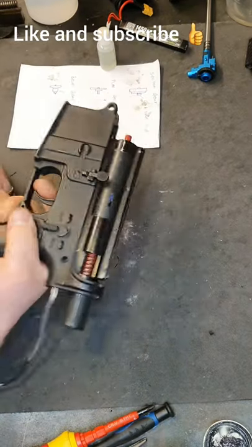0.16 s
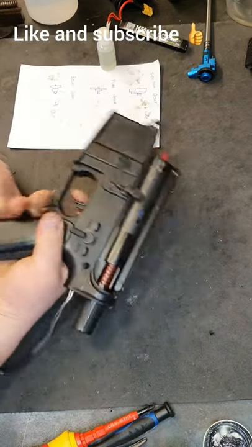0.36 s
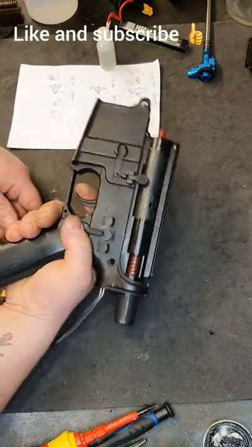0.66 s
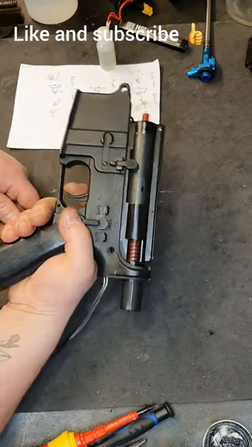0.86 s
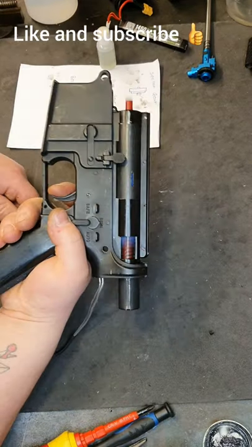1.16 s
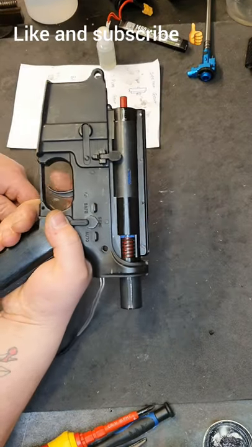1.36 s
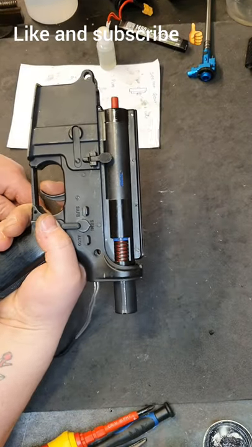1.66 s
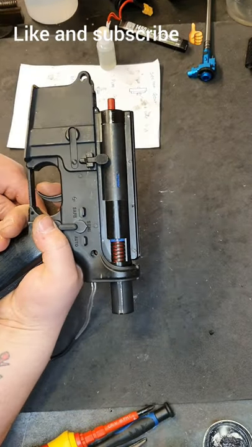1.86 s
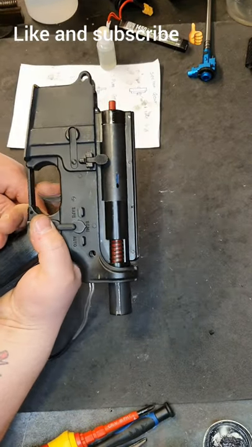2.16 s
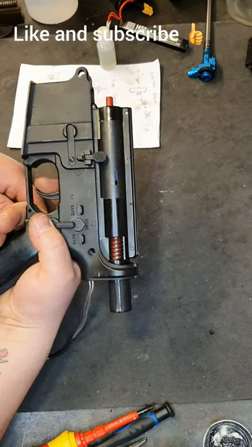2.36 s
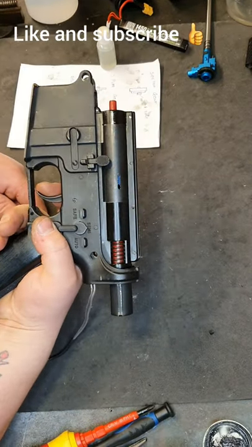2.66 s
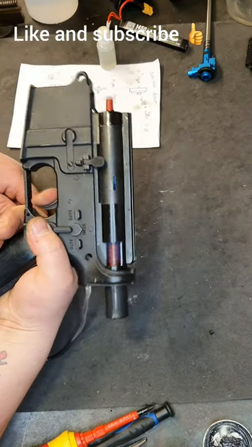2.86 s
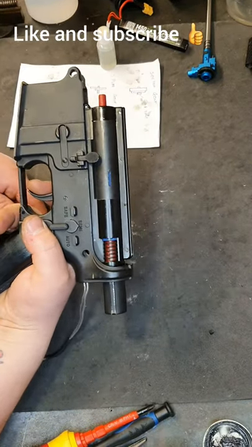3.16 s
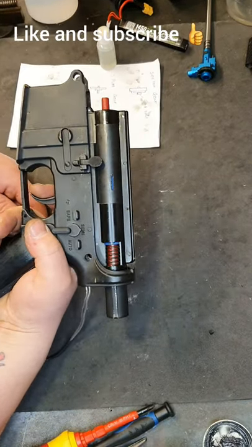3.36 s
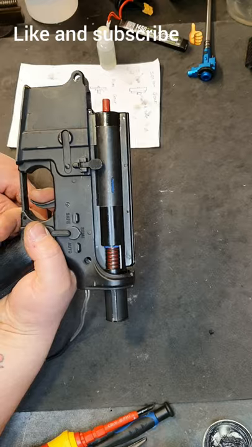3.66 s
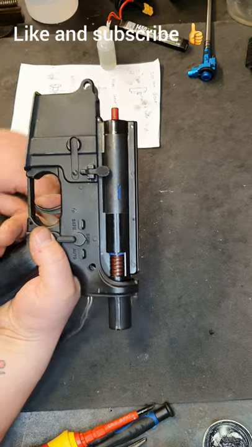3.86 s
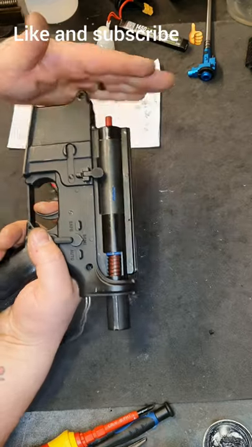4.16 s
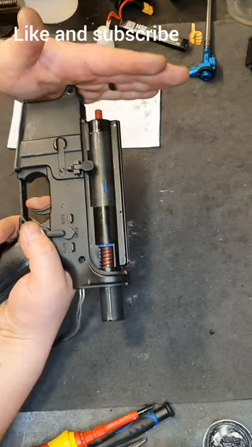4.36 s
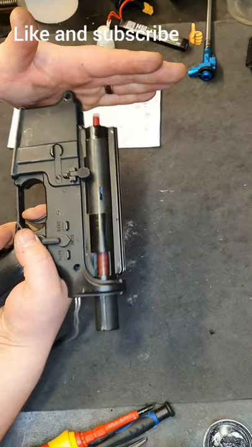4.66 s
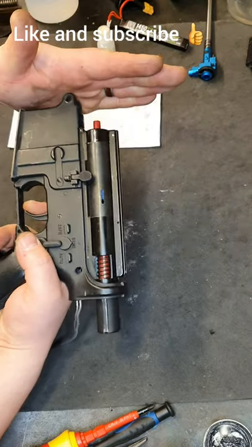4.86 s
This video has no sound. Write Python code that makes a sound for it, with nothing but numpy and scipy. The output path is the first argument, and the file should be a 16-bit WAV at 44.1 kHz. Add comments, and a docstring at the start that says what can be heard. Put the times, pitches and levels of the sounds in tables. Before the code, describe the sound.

An electric toy gun fires four single sharp shots with a brief gear whirr, amid soft hand rubbing in a small room.

```python
"""Airsoft gearbox on a workbench

An opened electric airsoft gearbox is dry-fired four times in a small room. On each shot the motor kicks
in, the gears wind the spring, the piston slams home, the gears coast and a latch catches them.
Between shots the hands rub and tick on the plastic shell and bump the bench, over a steady hush."""
import sys
import numpy as np
from scipy import signal
from scipy.fft import rfft, irfft, next_fast_len
from scipy.io import wavfile
from scipy.ndimage import uniform_filter1d, map_coordinates

SR = 44100
rng = np.random.default_rng(int(sys.argv[2]) if len(sys.argv) > 2 else 0)


def materialize(psi):
    """Save the field psi as 16-bit PCM at rate SR to the path in sys.argv[1].

    A 1-D psi becomes a single channel; in a 2-D psi each row is a channel.
    """
    bounded = np.clip(np.atleast_2d(psi).T, -1, 1)
    quanta = np.round(bounded * 32767).astype(np.int16)
    wavfile.write(sys.argv[1], SR, quanta)


N = 220852

# The four shots. Each row: motor start, piston slam and latch catch in seconds; levels of the gears,
# motor kick, piston rebound and latch in dB; the latch bounce's delay in seconds and level in dB.
SHOTS = [(1.1515, 1.197, 1.2905, -9.7, -6.5, -7, -10, .014, -15),
         (2.0315, 2.0703, 2.1585, -14.5, -15.5, -12, -13.5, .0105, -23),
         (2.827, 2.8705, 2.9625, -13, -13.5, -11.5, -16.3, .0075, -20),
         (4.629, 4.667, 4.7675, -10, -9.5, -11, -12, .009, -27)]
# Resonances of the gearbox shell. Each row: frequency in Hz, width in Hz, peak strength in dB.
SHELL = [(121, 39, -7.5), (276.5, 8.3, 10), (368, 18, 2), (423, 20, 6.5), (530, 70, 1), (718, 91, 9),
         (1116, 56, -3), (1370, 90, 0.5), (1553, 41, 0.5), (1935, 72, 2), (2140, 20, -3), (2841, 81, -0.5),
         (3020, 37, -4.5), (3686, 100, 1.5), (3884, 120, 5), (4540, 120, -7), (6800, 250, 0.5),
         (11960, 1000, 0)]
# Tone of the piston's slam. Each row: frequency in Hz, relative level in dB.
PISTON_TONE = [(40, -22.5), (200, -11), (450, -7.5), (700, -8), (1500, 6), (4000, -0.5), (7000, -1),
               (12000, -2), (16000, -9)]
# Tone of the latch's snap. Each row: frequency in Hz, relative level in dB.
LATCH_TONE = [(40, -16), (150, -19.5), (380, -12), (600, 1), (800, -0.5), (1050, -3), (2000, 3.5),
              (4500, 3.5), (7500, -8.5), (12000, -9), (16000, -12.5)]
FLIGHT_S = .0053  # from the piston's release until it hits the cylinder head


def gears(mesh_hz=1950, spin_up_s=.012, swell_db=14, coast_db=-19.5, coast_s=.046, slowing_s=.18):
    """The gears grow louder as the spring loads them, hush as the piston flies, then coast and brake."""
    # Tone of the gears under load, then running free. Each row: frequency in Hz, relative level in dB.
    winding_tone = [(40, -33), (160, -11), (380, -17), (700, -8), (1100, -1.5), (2400, -0.5), (3500, 2.5),
                    (4500, 4.5), (5800, -5.5), (9000, -11), (16000, -17.5)]
    coasting_tone = [(40, -37.5), (200, -18), (500, -3.5), (1100, -.5), (1600, -0.5), (2600, 2.5),
                     (3800, 4), (5500, -1), (8000, -5.5), (12000, -8), (16000, -12)]
    loaded, free, t = np.zeros(N), np.zeros(N), np.arange(SR // 5) / SR
    for start, slam, _, gear_db, *_ in SHOTS:
        load = t / (slam - FLIGHT_S - start)
        speed = 1 - np.exp(-t / spin_up_s)
        effort_db = swell_db * (np.minimum(load / 0.68, 1) - 1)
        engaged = np.clip((1 - load) / 0.065, 0, 1)  # the last tooth slips off the piston
        add(loaded, start, amp(gear_db + effort_db) * engaged * teeth(mesh_hz * speed, scrape=1.0))
        braking_s = np.maximum(t - coast_s, 0)
        whirr = teeth(mesh_hz * np.exp(-braking_s / slowing_s), scrape=1.1)
        add(free, slam + .0045, amp(coast_db - 560 * braking_s) * whirr)  # fades 560 dB a second
    rattle = amp(1.8 * wobble(300))
    return coloured(loaded * rattle, winding_tone, SHELL) + coloured(free * rattle, coasting_tone, SHELL)


def teeth(rate_hz, scrape):
    """Gear teeth meet early or late within their play, and scrape between meetings."""
    count = len(rate_hz)
    play = np.abs(1 + 1.3 * uniform_filter1d(rng.standard_normal(count), size=40))
    teeth_passed = np.floor(np.cumsum(rate_hz * play) / SR)
    meetings = np.diff(teeth_passed, prepend=0) - rate_hz / SR
    buzz = meetings * np.sqrt(SR / rate_hz.max())
    return (buzz + scrape * rng.standard_normal(count)) / np.hypot(1, scrape)


def impacts():
    """The motor takes up the gear play, the piston slams, the latch drops in; each rings the shell."""
    # Tone of the motor's kick. Each row: frequency in Hz, relative level in dB.
    kick_tone = [(40, -25), (160, -17.5), (400, -15.5), (620, -1), (760, 7.5), (1000, -1), (2500, 4.5),
                 (4200, 2.5), (6000, -18.5), (16000, -26.5)]
    kicks = strikes([(start, kick_db) for start, _, _, _, kick_db, *_ in SHOTS], t60=.052, attack=.003)
    slams = strikes(piston_blows(), t60=.015)
    catches = strikes(latch_blows(), t60=0.033, attack=0.00015)
    return (coloured(kicks, kick_tone, SHELL) + coloured(slams, PISTON_TONE, SHELL)
            + coloured(catches, LATCH_TONE, SHELL))


def piston_blows(slam_db=-4, rebound_s=.031, settle_s=.009, settle_loss_db=5.5):
    """The piston hits, comes back, then once more, sooner and weaker: (seconds, dB) of each blow."""
    blows = []
    for _, slam, _, _, _, rebound_db, *_ in SHOTS:
        back = slam + rebound_s
        blows += [(slam, slam_db), (back, rebound_db), (back + settle_s, rebound_db - settle_loss_db)]
    return blows


def latch_blows():
    """The latch drops in and bounces once: (seconds, dB) of each blow."""
    blows = []
    for _, _, catch, *_, latch_db, delay, bounce_db in SHOTS:
        blows += [(catch, latch_db), (catch + delay, bounce_db)]
    return blows


def cracks(piston_db=-3.5, latch_db=-3.0):
    """The first instant of each hard contact reaches left and right straight from the metal."""
    def channel():
        slam = amp(piston_db) * coloured(strikes(piston_blows(), t60=.009), PISTON_TONE)
        snap = amp(latch_db) * coloured(strikes(latch_blows(), t60=0.017), LATCH_TONE)
        return slam + snap
    return np.vstack([channel(), channel()])


def recoil(shake_db=-27.5, rise_s=0.011, ring_db=-72.0):
    """The released spring shakes the whole shell and rings on thinly."""
    # The spring's partials. Each row: frequency in Hz, relative level in dB, t60 in seconds.
    partials = [(7980, -7.5, .6), (8145, -4, .6), (8360, -1.5, .7), (8900, -10.5, 0.95), (9200, -2.5, 0.85)]
    # Tone of the low shudder. Each row: frequency in Hz, relative level in dB.
    shake_tone = [(25, -21), (70, -8.5), (115, 2), (165, -2.5), (280, -4), (500, -9.5), (1200, -26.5),
                  (5000, -60)]
    shake, ring, t = np.zeros(N), np.zeros(N), np.arange(SR // 2) / SR
    swell = amp(shake_db) * (t / rise_s) * np.exp(1 - t / rise_s)
    for _, slam, *_ in SHOTS:
        release = slam - FLIGHT_S
        add(shake, release, swell * rng.standard_normal(len(t)))
        for hz, db, t60 in partials:
            decay = amp(ring_db + db + rng.normal(0, 3.5) - 60 * t / t60)
            add(ring, release, decay * np.sin(2 * np.pi * hz * t))
    return coloured(shake, shake_tone, SHELL) + ring


def bumps(drag_db=-30, drag_rise_s=0.0069):
    """Soft pushes set the bench booming; firmer ones reach its higher modes, and each drags a little."""
    # Pushes on the bench. Each row: start in seconds, level in dB, corner in Hz (lower is softer).
    pushes = [(3.913, -16.5, 150), (3.956, -9.5, 330), (3.969, -12, 250), (4.018, -12.5, 220),
              (4.030, -8.5, 121)]
    # Tone of the bench top. Each row: frequency in Hz, relative level in dB.
    bench_tone = [(20, -40), (60, 0.5), (250, -2.5), (450, -0.5), (850, 7.5), (1500, -22), (16000, -54)]
    # Resonances of the bench. Each row: frequency in Hz, width in Hz, peak strength in dB.
    bench_modes = [(73, 8, 26), (127, 14.5, 23.5), (197, 17.4, 26), (299, 24, 18)]
    force, t = np.zeros(N), np.arange(SR // 10) / SR
    drag = amp(drag_db) * (t / drag_rise_s) * np.exp(1 - t / drag_rise_s)
    for start, db, corner_hz in pushes:
        contact = drag * rng.standard_normal(len(t))
        contact[0] = 1  # the push itself
        cushion = np.exp(-2 * np.pi * corner_hz * t) * np.sqrt(corner_hz / SR)
        add(force, start, amp(db) * signal.fftconvolve(contact, cushion))
    return coloured(force, bench_tone, bench_modes)


def plastic_ticks(motion, trigger_lead_s=.043, trigger_db=-43):
    """The shell ticks and creaks in the hand, and the trigger clicks just before the motor starts."""
    # Clear ticks of the shell. Each row: start in seconds, level in dB.
    ticks = [(.225, -32), (.604, -36), (.634, -33), (.727, -35.5), (.902, -34), (1.549, -43), (1.666, -42),
             (1.736, -44.5), (2.374, -43.5), (2.69, -47), (3.349, -43.5), (3.958, -38.5), (4.07, -35.5),
             (4.272, -42.5), (4.443, -40.5), (4.959, -46.5)]
    # Tone of the plastic. Each row: frequency in Hz, relative level in dB.
    plastic_tone = [(50, -11), (300, 6.5), (900, 4.5), (2000, 5), (4000, -3), (7000, -18), (16000, -46)]
    triggers = [(start - trigger_lead_s, trigger_db) for start, *_ in SHOTS]
    clicks = strikes(list(ticks) + triggers, t60=0.017, attack=0.00025)
    return coloured(clicks + creaks(motion), plastic_tone)


def creaks(motion, per_s=32, creak_db=1.5, scatter_db=3.5):
    """Tiny random ticks of the shell, louder when the hands are busier."""
    when, strength = rng.random((round(per_s * N / SR), 2)).T
    levels = creak_db + scatter_db * (2 * strength - 1)
    return motion * strikes(zip(when * N / SR, levels), t60=0.043)


def hand_motion(rest_db=-67, attack_s=0.058, release_s=0.25):
    """How briskly the hands rub, as a gain: each move rises, holds and dies away."""
    # The hands turn the gun, adjust their grip between shots, then shift to the muzzle.
    # Each row: start in seconds, end in seconds, level in dB.
    moves = [(-.2, 1.1, -50.5), (1.445, 1.696, -62), (1.865, 2.6, -61), (3.84, 4.07, -57),
             (4.185, 4.66, -57.3)]
    t = np.arange(N) / SR
    motion = np.full(N, amp(rest_db))
    for start, end, db in moves:
        shape = np.clip((t - start) / attack_s, 0, 1) * np.exp(-np.maximum(t - end, 0) / release_s)
        motion = np.hypot(motion, amp(db) * shape)
    return motion * amp(-0.04 * wobble(15))  # a trace of unevenness


def rubbing(motion, rub_db=-2.0, grain_db=3.0, tremor_db=2):
    """Fingers rub in small uneven slips and the bench trembles with them."""
    # Tone of the fingers and of the trembling bench. Each row: frequency in Hz, relative level in dB.
    rub_tone = [(88, -25), (150, -2), (179, -6), (217, -8.5), (315, -9), (702, -7), (1060, -7.5),
                (2500, -11), (6640, -28.5), (16000, -53.5)]
    tremor_tone = [(20, -11.5), (50, 2.5), (100, 1), (160, -1.5), (300, -17), (1000, -59.5)]
    slips = diffuse(N) * unit(amp(grain_db * wobble(70)))
    rub = amp(rub_db) * coloured(slips, rub_tone)
    tremor = amp(tremor_db) * coloured(diffuse(N), tremor_tone, modes=[(75.5, 18, 11)])
    return motion * (rub + tremor)


def slides():
    """Skin hisses over plastic: each stroke swells and fades, some duller than others."""
    # Strokes over the shell. Each row: start and end in seconds, level in dB, treble corner in Hz.
    strokes = [(-.12, 0.126, -59, 14000), (0.238, 0.467, -50, 13800), (.423, 0.553, -53.5, 11000),
               (0.505, .74, -55.5, 6500), (0.745, 0.907, -53, 8000), (3.671, 3.943, -52.5, 22000),
               (3.87, 4.12, -59, 18000)]
    # Tone of sliding skin. Each row: frequency in Hz, relative level in dB.
    skin_tone = [(100, -48), (1000, 0), (3000, -2), (5000, -2), (9000, -7.5), (16000, -15)]
    hiss, out, t = coloured(diffuse(N), skin_tone), np.zeros((2, N)), np.arange(N) / SR
    for start, end, db, corner_hz in strokes:
        swell = amp(db) * np.sin(np.pi * np.clip((t - start) / (end - start), 0, 1)) ** 2
        out += filtered(swell * hiss, lambda hz: 1 / np.hypot(1, (hz / corner_hz) ** 3))
    return out


def room(x, early_db=-2, tail_db=-5.5):
    """Bass arrives directly, treble by diffuse, ever-changing reflections that spread it wide."""
    # The reverb send. Each row: frequency in Hz, share of the power sent to the reflections.
    send = [(100, .15), (300, 0.16), (750, .65), (1500, .88), (8000, 0.96)]
    direct = filtered(x, lambda hz: np.sqrt(1 - along(send, hz)))
    sent = filtered(x, lambda hz: np.sqrt(along(send, hz)))
    early = shifting(sent, early_reflections, step=SR // 70)
    tail = shifting(sent, room_tail, step=SR // 10)
    return direct + amp(early_db) * early + amp(tail_db) * tail


def early_reflections(t60=0.035):
    """Dense first reflections from the bench top and the things on it."""
    t = np.arange(1024) / SR
    return diffuse(len(t)) * amp(-60 * t / t60)


def room_tail(rise_s=0.0032):
    """The room's short tail, in which the top treble dies first."""
    # The room's decay. Each row: frequency in Hz, t60 in seconds.
    decay_times = [(100, 0.12), (700, 0.142), (2000, 0.132), (4000, 0.11), (9000, 0.125), (16000, 0.09)]
    t = np.arange(SR // 4) / SR
    hz, age, bands = signal.stft(diffuse(len(t)), SR, nperseg=256)
    decay = amp(-60 * age / along(decay_times, hz)[:, None])
    _, tail = signal.istft(bands * decay, SR, nperseg=256)
    return tail[:, :len(t)] * (1 - np.exp(-t / rise_s))


def hush(level_db=-61.0):
    """A steady, bass-heavy room tone."""
    # Tone of the background. Each row: frequency in Hz, relative level in dB.
    hush_tone = [(12, -36), (20, -10), (81, -1.5), (150, -8), (222, -16), (328, -20.5), (527, -17.5),
                 (849, -23), (1400, -22.5), (1570, -21.5), (2530, -26), (7310, -58), (16000, -56.5)]
    return amp(level_db) * coloured(diffuse(N), hush_tone)


def strikes(rows, t60, attack=0.0001):
    """Hard contacts from (seconds, dB) rows: each a burst of chatter that dies within milliseconds."""
    track, t = np.zeros(N), np.arange(SR // 10) / SR
    for start, db in rows:
        envelope = amp(db - 60 * t / t60) * (1 - np.exp(-t / attack))
        add(track, start, envelope * rng.choice([-1, 1], len(t)))
    return track


def diffuse(count):
    """Stereo white noise: left and right alike in the bass, unrelated in the treble."""
    # Stereo width. Each row: frequency in Hz, ratio of side power to mid power.
    width = [(60, 0.026), (160, 0.024), (350, 0.57), (750, 0.29), (1300, 0.98), (8000, 0.99)]
    ratio = along(width, np.fft.rfftfreq(count, 1 / SR))
    gains = np.sqrt(np.array([np.ones_like(ratio), ratio]) / (1 + ratio))
    mid, side = irfft(rfft(rng.standard_normal((2, count))) * gains, count)
    return np.array([mid + side, mid - side])


def coloured(x, tone, modes=(), size=8192):
    """Pass x through a causal filter of unit energy: a broad tone with resonances standing on it."""
    hz = np.fft.rfftfreq(size, 1 / SR)
    peaks = 1 + sum(amp(db) ** 2 / (1 + (2 * (hz - f) / width) ** 2) for f, width, db in modes)
    cepstrum = irfft(np.log(amp(along(tone, hz)) * np.sqrt(peaks)))
    cepstrum[1:size // 2] *= 2  # fold to minimum phase, so nothing rings ahead of a hit
    cepstrum[size // 2 + 1:] = 0
    response = irfft(np.exp(rfft(cepstrum)))
    return signal.oaconvolve(np.atleast_2d(x), response[None] / np.linalg.norm(response), axes=1)[:, :N]


def shifting(x, response, step):
    """Convolve with a stereo response that is drawn anew every step samples and cross-faded."""
    out = np.zeros((2, N))
    fade = np.sin(np.pi * np.arange(2 * step) / (2 * step))
    for first in range(0, N, step):
        piece = x[first:first + 2 * step]
        echo = response()
        echo = echo / np.sqrt(np.sum(echo ** 2) / 2)
        add(out, first / SR, signal.fftconvolve((piece * fade[:len(piece)])[None], echo, axes=1))
    return out


def filtered(x, gain):
    """Equalise x with a smooth gain of frequency."""
    size = next_fast_len(N + 4096)
    return irfft(rfft(x, size) * gain(np.fft.rfftfreq(size, 1 / SR)), size)[..., :N]


def wobble(rate):
    """A smooth random curve, rate knots a second."""
    return map_coordinates(rng.standard_normal(N // 100), [np.arange(N) * rate / SR], mode="wrap")


def along(points, hz):
    """Read (Hz, value) points on a log frequency axis."""
    freqs, values = np.transpose(points)
    return np.interp(np.log(hz + 1), np.log(freqs + 1), values)


def add(track, start_s, x):
    """Mix x into the track from start_s on."""
    first = max(round(start_s * SR), 0)
    part = track[..., first:first + x.shape[-1]]
    part += x[..., :part.shape[-1]]


def amp(db):
    """Decibels to gain."""
    return 10 ** (np.asarray(db) / 20)


def unit(x):
    """Scale to rms 1."""
    return x / np.sqrt(np.mean(x ** 2) + 1e-20)


def scene():
    """The gun and its small ticks in the room, with handling and a steady background hush."""
    motion = hand_motion()
    ticks = plastic_ticks(motion)
    gun = gears() + impacts() + recoil() + ticks
    return room(gun[0]) + cracks() + bumps() + rubbing(motion) + slides() + hush()


def record(dry):
    """Soft clipping rounds off the highest peaks, and a steep high cut trims the top of the treble."""
    ceiling, top_hz = .9, 16400
    rounded = dry / (1 + np.abs(dry / ceiling) ** 6) ** (1 / 6)
    return filtered(rounded, lambda hz: np.sin(np.pi / 2 * np.clip((top_hz - hz) / 600, 0, 1)) ** 2)


dry = scene()
out = record(dry)
materialize(out)
```